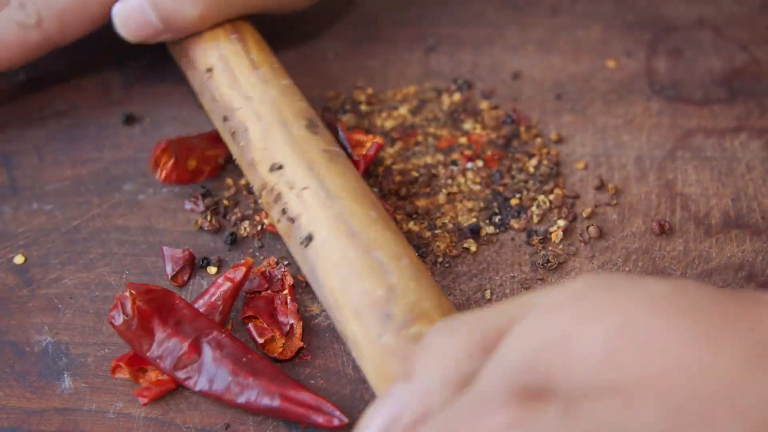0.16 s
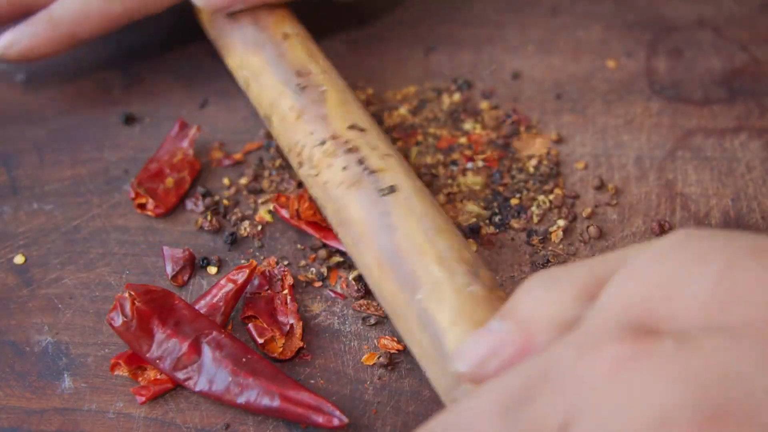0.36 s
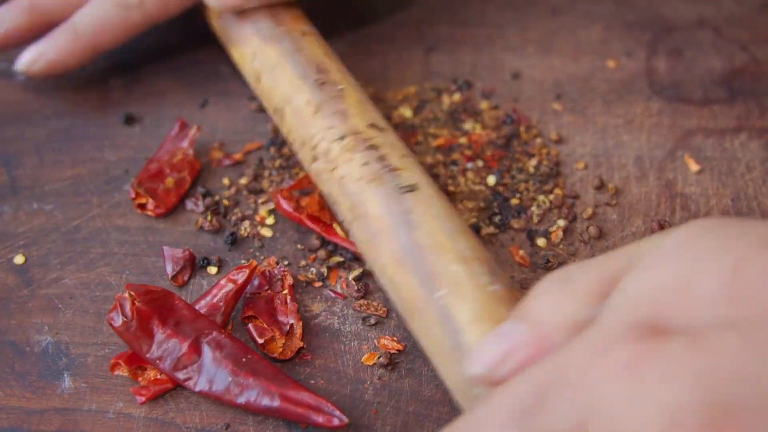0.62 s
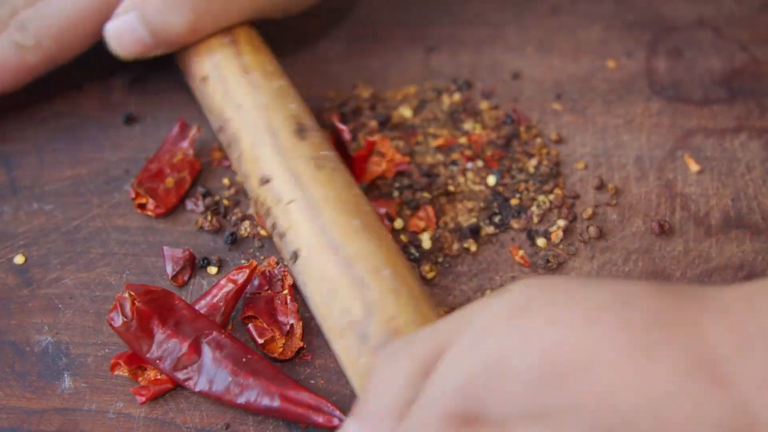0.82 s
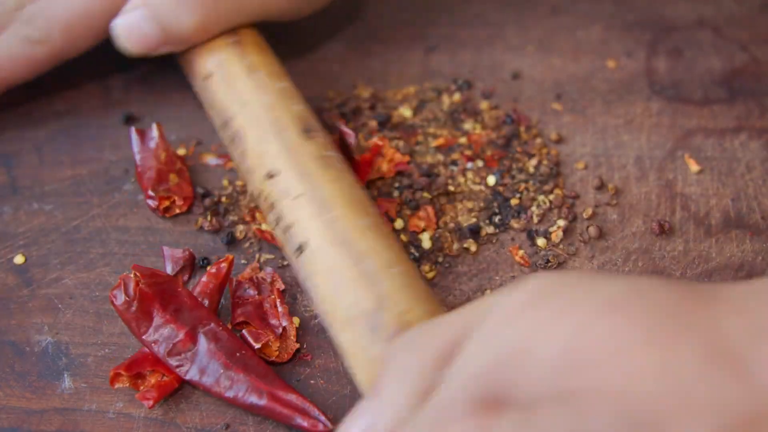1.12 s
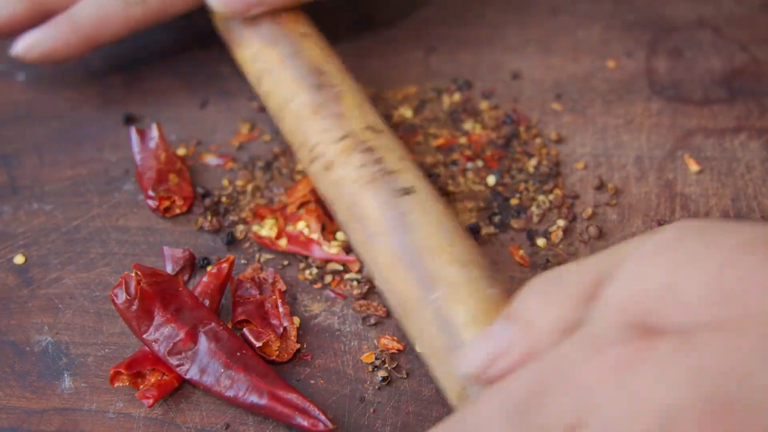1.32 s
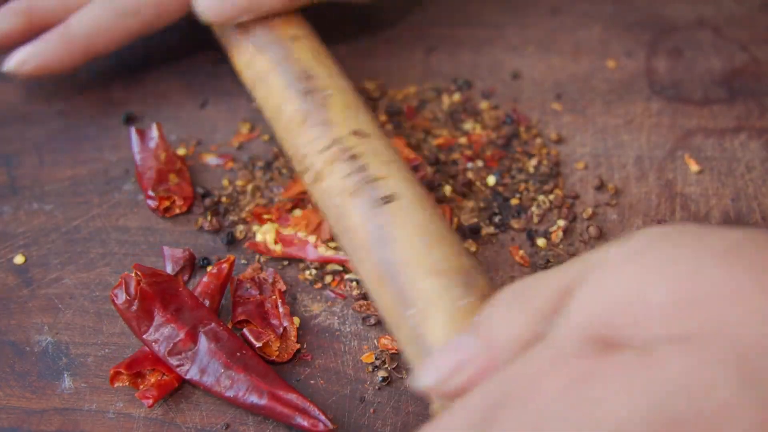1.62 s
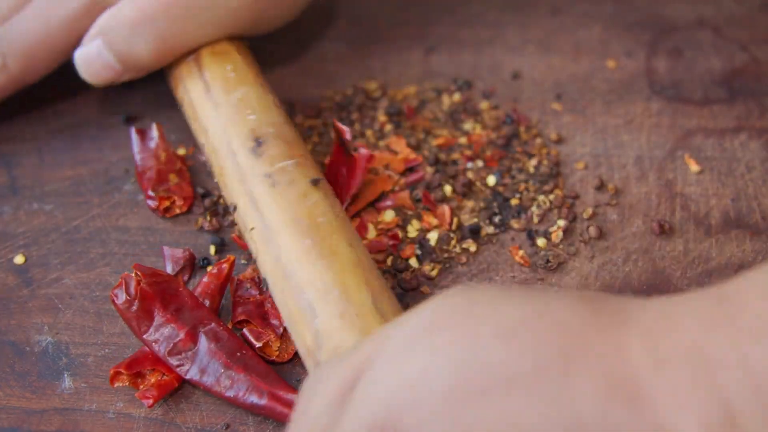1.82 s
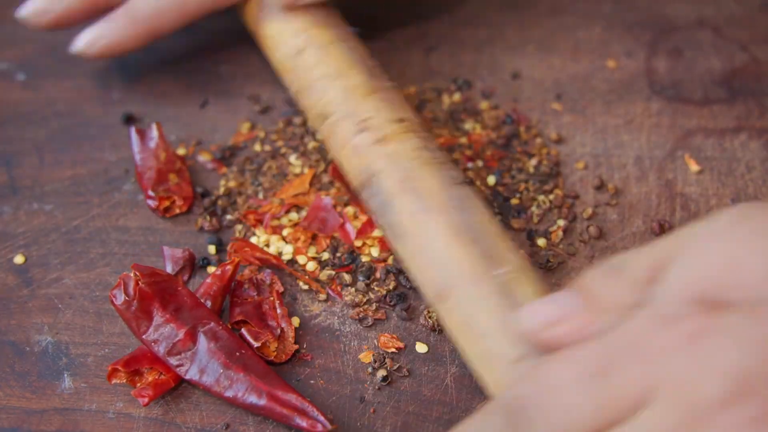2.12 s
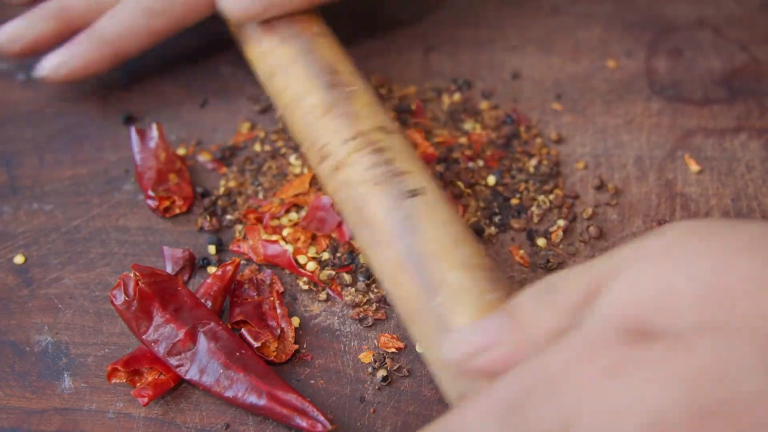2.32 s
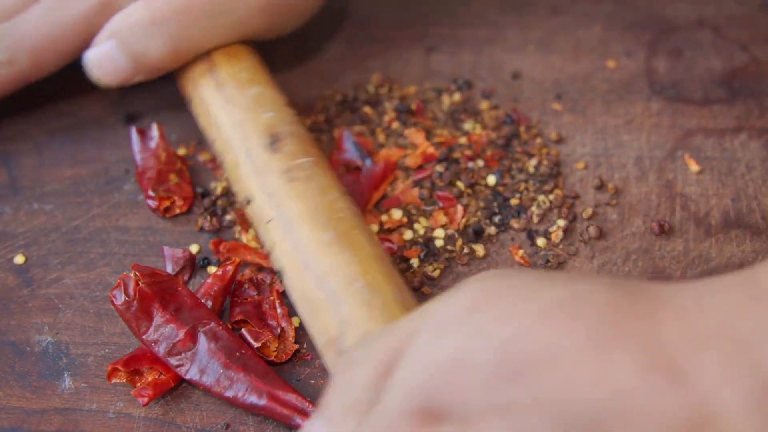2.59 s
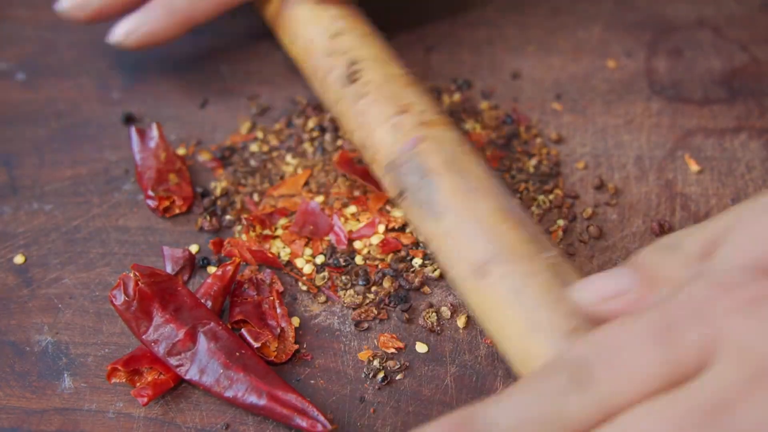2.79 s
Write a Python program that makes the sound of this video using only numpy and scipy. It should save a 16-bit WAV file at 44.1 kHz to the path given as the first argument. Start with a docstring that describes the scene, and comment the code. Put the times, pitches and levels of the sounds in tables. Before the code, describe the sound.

Close crunching and crackling of dried spices fills a small room as a wooden pin rolls back and forth over chilies and peppercorns. After a soft opening hiss, husks snap repeatedly while the pin bumps and knocks against the board.

```python
"""Rolling pin over dried chilies

Close on one microphone in a small room, a wooden pin rolls over chilies and peppercorns on a board.
Crumbs crunch, dry skins rustle and the table thuds under the bumpy roll; one whole pod hisses flat.
Husks burst in sharp cracks that ring pin and board, and the pin knocks as it drops off a grain.
A fast limiter behind the microphone flattens the loudest cracks."""
import sys
import numpy as np
from scipy import signal
from scipy.fft import rfft, irfft
from scipy.io import wavfile
from scipy.ndimage import uniform_filter1d, minimum_filter1d

SR = 44100
rng = np.random.default_rng(int(sys.argv[2]) if len(sys.argv) > 2 else 0)


def digitize_waveform(pressure):
    """Quantize a signal to 16-bit integers and store it at the path in sys.argv[1].

    Rows of a 2-D input are taken as channels; values are limited to [-1, 1].
    """
    field = np.atleast_2d(pressure).T
    bounded = np.clip(field, -1, 1)
    quanta = np.round(bounded * 32767).astype(np.int16)
    wavfile.write(sys.argv[1], SR, quanta)


N = 130095

# Table levels are relative; each source adds its own gain.
# crunch under the pin, a curve: time_s, wood_db, crackle_db, rustle_db
CRUNCH_LEVELS = [(0.02, -51.5, -54, -55), (0.1, -41.5, -45, -42), (0.16, -47.5, -58, -52.5),
                 (0.27, -43, -54, -40), (0.41, -40, -48, -44.5), (0.47, -44, -48.5, -49.5),
                 (0.56, -39.5, -47, -50.5), (0.655, -46.5, -51, -49), (0.72, -36.5, -44.5, -45.5),
                 (0.83, -45, -49.5, -53.5), (0.92, -39, -46.5, -49.3), (1.0, -39, -41, -45),
                 (1.075, -52, -59, -63), (1.11, -48.5, -52.5, -62), (1.15, -36.5, -45.5, -45.5),
                 (1.23, -34.5, -43, -46), (1.36, -46, -51.5, -57), (1.435, -35.5, -44.5, -48),
                 (1.505, -52.5, -62.5, -67), (1.58, -39, -45, -50), (1.68, -38.5, -41, -49),
                 (1.76, -36, -42, -45), (1.84, -48, -50, -56), (1.89, -45.5, -52.5, -58),
                 (1.96, -64.4, -67, -85), (2.005, -36.5, -42, -47), (2.08, -44, -50.5, -56),
                 (2.17, -36.1, -47.5, -51), (2.25, -48.5, -56.7, -64), (2.29, -39.5, -44, -52),
                 (2.41, -38, -43, -48.5), (2.5, -39, -43.9, -50.5), (2.56, -64, -61.5, -68),
                 (2.61, -59, -66, -83), (2.7, -42, -45, -52.5), (2.74, -47.5, -53, -62),
                 (2.825, -32, -40, -45.5), (2.89, -51, -53.5, -57), (2.94, -38, -45.5, -52)]
# table shaken by the rolling, a curve: time_s, level_db
THUD_LEVELS = [(0.05, -64), (0.25, -57), (0.49, -60), (0.555, -37.5), (0.63, -64), (0.7, -44), (0.83, -66),
               (0.97, -44.5), (1.08, -69), (1.15, -48), (1.36, -53), (1.43, -48.5), (1.5, -56), (1.55, -48),
               (1.7, -50), (1.93, -73), (2.0, -52), (2.16, -50.5), (2.24, -66), (2.3, -47), (2.6, -69.5),
               (2.83, -47), (2.92, -57)]
# husks bursting: start_s, snap_db, treble_db, wood_db
HUSK_BURSTS = [(0.2057, -45, -33.5, -39), (0.2879, -41, -32, -36), (0.3294, -42.5, -44, -41.5),
               (0.3744, -41.2, -38.5, -34), (0.4405, -43, -57, -31.5), (0.5477, -30, -39.5, -25.5),
               (0.5831, -31.5, -45.5, -27.8), (0.6765, -28.5, -42, -27), (0.7435, -40, -57, -36),
               (0.7576, -36, -45, -33.5), (0.9064, -29, -40, -26.5), (0.9264, -36, -54, -41),
               (0.955, -24.5, -29.5, -32.5), (0.979, -31.5, -39, -27.5), (1.0092, -40, -56, -34),
               (1.0982, -38.5, -52, -59), (1.1249, -28.0, -34, -27.5), (1.1639, -30, -43, -28.5),
               (1.1861, -31.5, -47, -32), (1.2027, -33, -41, -27.5), (1.218, -33.5, -62, -37),
               (1.2333, -38, -59, -29), (1.259, -35.5, -45, -34), (1.2767, -30, -44, -27),
               (1.4007, -34.5, -50, -28), (1.5552, -28, -40, -26.5), (1.5695, -28, -42, -36),
               (1.6248, -28.5, -38, -30), (1.6515, -27, -40, -31), (1.6618, -29, -31.6, -28),
               (1.7389, -32, -52, -37.5), (1.7446, -34, -36, -33.5), (1.9887, -28.5, -41, -27.5),
               (2.1132, -27, -37, -29), (2.1514, -34, -48, -31.5), (2.1819, -33.5, -45, -28),
               (2.2693, -30.5, -42.5, -26), (2.3033, -31, -39, -34), (2.321, -38, -49, -31.5),
               (2.3483, -28.5, -43, -33.5), (2.3892, -32, -46.5, -28.5), (2.5162, -34.8, -47, -34.5),
               (2.6179, -41, -54.5, -40.5), (2.67, -36.5, -50, -31.5), (2.7926, -39.5, -64, -40),
               (2.8133, -29.5, -40.5, -33), (2.9082, -39.5, -63, -38.5), (2.9382, -39.5, -61, -35)]
# the pin dropping onto the board: start_s, level_db, clack_db
PIN_DROPS = [(0.5044, -39, -37), (0.5227, -29.5, -46), (1.411, -39, -57), (1.4235, -29, -61),
             (1.5264, -26.5, -28), (2.162, -27, -24.5), (2.2909, -30.5, -29.5), (2.8025, -30.5, -42.8)]
# ringing modes of board, pin and table: pitch_hz, level_db, t60_s
BOARD_MODES = [(843.7, 0, 0.028), (980, 2, 0.0093), (1205, -2.5, 0.016), (1267, -3.5, 0.014),
               (1250, -10.5, 0.021), (2060, -8, 0.023), (2626, -16, 0.016)]
PIN_MODES = [(2060, -11.5, 0.021), (3206, 4, 0.019), (4575, -1, 0.011), (6236, -3.5, 0.012)]
TABLE_MODES = [(93, 1, 0.17), (174, -7, 0.14), (309, -12.5, 0.25), (420.7, -8, 0.12)]
# spectra: frequency_hz, level_db
RUMBLE_SPECTRUM = [(22, -18.5), (33, -7.5), (41, -18.5), (60, -28), (150, -46), (600, -61)]  # the room's low air
GRIND_SPECTRUM = [(60, -20), (220, 1.5), (580, -14.5), (720, -0.5), (900, 9.5), (1250, 12), (1600, -3),
                  (4000, -23.5)]  # dull body of the wood
CRACKLE_SPECTRUM = [(300, -9.5), (1000, -11), (1800, 0.5), (2600, 5.5), (3300, 3), (4700, 7), (6500, 1),
                    (9000, -15), (14500, -17.5)]  # crumbs breaking
RUSTLE_SPECTRUM = [(1000, -69), (3000, -22.5), (5000, -10), (7000, 4), (8700, 5.5), (10500, -4),
                   (12500, -0.5), (14500, -5)]  # dry skins
POD_SPECTRUM = [(2200, -13), (4500, 7), (8500, -1), (10500, -2.5), (14500, -0.5)]  # a whole pod sliding under the pin
SNAP_SPECTRUM = [(300, -24), (900, -14.5), (1900, 7.5), (2600, 12.5), (3300, 5), (4600, 9), (6300, -7.5),
                 (8500, -9), (14500, -33.5)]  # a husk tearing
CLACK_SPECTRUM = [(700, -8.5), (1600, 5), (3300, -0.5), (5000, -59)]  # hard edge of a knock

CONTACT_HZ = 1084  # the board's pitch under a blow


def amp(db):
    """Decibels to gain."""
    return 10 ** (np.asarray(db) / 20)


def blow(x, duration_s=0.005):
    """Scales a short sound to the energy of rms 1 held for duration_s."""
    return x * np.sqrt(duration_s * SR / (np.sum(x ** 2) + 1e-20))


def level(curve, column=1):
    """One dB column of a curve as gain per sample."""
    rows = np.array(curve)
    return amp(np.interp(np.arange(N) / SR, rows[:, 0], rows[:, column]))


def add(mix, start_s, sound):
    """Mixes a sound in at start_s."""
    part = mix[max(round(start_s * SR), 0):][:len(sound)]
    part += sound[:len(part)]


def through(x, response):
    """Convolves, keeping the length."""
    return signal.fftconvolve(x, response)[:len(x)]


def colour(spectrum, size=4096):
    """Minimum-phase impulse response with the given spectrum."""
    hz, db = np.transpose(spectrum)
    bins_hz = np.fft.rfftfreq(size, 1 / SR)
    gain = amp(np.interp(np.log(bins_hz + 1), np.log(hz), db))
    cepstrum = irfft(np.log(gain))
    cepstrum[1:size // 2] *= 2
    cepstrum[size // 2 + 1:] = 0
    return irfft(np.exp(rfft(cepstrum)))


def ringing(modes, size=6000):
    """Impulse response of dying modes of alternating sign."""
    t = np.arange(size) / SR
    return sum((-1) ** k * amp(db) * np.exp(-np.log(1000) * t / t60_s) * np.sin(2 * np.pi * hz * t)
               for k, (hz, db, t60_s) in enumerate(modes))


def steady(x, size=1000):
    """Holds the running level at 1, leaving single grains standing out."""
    power = uniform_filter1d(uniform_filter1d(x ** 2, size), size)
    return x / np.sqrt(abs(power) + 1e-12)


def room_tone():
    """The room at the microphone: deep rumble and faint hiss."""
    rumble = through(rng.standard_normal(N), colour(RUMBLE_SPECTRUM, size=32768))
    hiss = rng.standard_normal(N)
    return amp(-49.5) * steady(rumble, size=5000) + amp(-92) * hiss


def fractures(per_s=2600, spread_db=5.5):
    """Tiny random fractures, many faint and a few strong."""
    strengths = amp(spread_db * np.minimum(rng.exponential(1, N), 3.28))
    return strengths * rng.choice([-1, 1], N) * (rng.random(N) < per_s / SR)


def crumb_crunch():
    """Crumbs break under the pin: they crackle, and ring pin, board and table; dry skins rustle."""
    clicks = fractures()
    decay = np.exp(-np.arange(64) / SR / 0.00059)  # each click sets off a puff of noise
    tearing = np.sqrt(abs(through(clicks ** 2, decay))) * rng.standard_normal(N)
    board = amp(-3) * steady(through(clicks, ringing(BOARD_MODES)))
    grind = amp(-2) * steady(through(clicks, colour(GRIND_SPECTRUM)))
    table = amp(-24.5) * steady(through(clicks, ringing(TABLE_MODES[2:])))
    crackle = amp(-1.5) * steady(through(tearing, colour(CRACKLE_SPECTRUM)))
    pin = amp(-2.5) * steady(through(clicks, ringing(PIN_MODES)))
    rustle = amp(0.5) * steady(through(tearing, colour(RUSTLE_SPECTRUM)))
    return ((board + grind + table) * level(CRUNCH_LEVELS, column=1)
            + (crackle + pin) * level(CRUNCH_LEVELS, column=2)
            + rustle * level(CRUNCH_LEVELS, column=3))


def table_thuds():
    """The bumpy roll shakes the low modes of the table under the board."""
    shaking = through(fractures(), ringing(TABLE_MODES))
    return amp(3) * level(THUD_LEVELS) * steady(shaking, size=2000)


def pod_hiss(peak_s=0.26, width_s=0.13):
    """A leathery pod hisses smoothly as the first stroke flattens it, swelling and fading."""
    swell = np.exp(-abs(np.arange(N) / SR - peak_s) / width_s)
    hiss = steady(through(rng.standard_normal(N), colour(POD_SPECTRUM)))
    return amp(-41) * swell * hiss


def board_contact(pitch_hz, swell_s, size=3000):
    """The first few heavily damped swings of the board under a blow."""
    t = np.arange(size) / SR
    return blow(t * np.exp(-t / swell_s) * np.sin(2 * np.pi * pitch_hz * t))


def husk_cracks(tear_s=0.001, crumble_s=0.0048, push_s=0.0011, board_delay_s=0.0008, size=3000):
    """A husk tears in a millisecond, crumbles briefly, and jolts pin and board."""
    out, t = np.zeros(N), np.arange(size) / SR
    snap, treble, grind = colour(SNAP_SPECTRUM), colour(RUSTLE_SPECTRUM), colour(GRIND_SPECTRUM)
    pin, board = ringing(PIN_MODES), ringing(BOARD_MODES)
    for start_s, snap_db, treble_db, wood_db in HUSK_BURSTS:
        tear, crumbs, jolt = rng.standard_normal((3, size))
        burst = blow(np.sign(tear) * np.exp(-(t / tear_s) ** 2))
        burst += amp(-6) * blow(crumbs ** 3 * np.exp(-t / crumble_s))
        crack = blow(through(burst, snap)) + amp(4.5) * blow(through(burst, pin))
        add(out, start_s, amp(snap_db + 0.5) * blow(crack))
        add(out, start_s, amp(treble_db + 5.5) * blow(through(burst, treble)))
        push = jolt * np.exp(-t / push_s)
        ring = amp(-1.5) * blow(through(push, board)) + amp(-6) * blow(through(push, grind))
        contact = board_contact(CONTACT_HZ * np.exp(0.11 * jolt[0]), push_s)  # pitch varies by husk
        add(out, start_s + board_delay_s, amp(wood_db + 0.5) * blow(contact + ring))
    return out


def pin_knocks(impact_s=0.00063, chatter_s=0.0061, size=3000):
    """The pin drops onto the board: a dull wood-on-wood blow with a hard edge and a short chatter."""
    out, t = np.zeros(N), np.arange(size) / SR
    board, grind, edge = ringing(BOARD_MODES), colour(GRIND_SPECTRUM), colour(CLACK_SPECTRUM)
    for start_s, level_db, clack_db in PIN_DROPS:
        chatter = rng.standard_normal(size) * np.exp(-t / chatter_s)
        ring = blow(through(chatter, board)) + blow(through(chatter, grind))
        knock = board_contact(CONTACT_HZ, impact_s) + amp(-5) * ring
        clack = through(chatter * np.exp(-t / impact_s), edge)
        add(out, start_s, amp(level_db + 4) * blow(knock))
        add(out, start_s, amp(clack_db - 0.5) * blow(clack))
    return out


def room_reflections(x, t60_s=0.17, delay_s=0.004, size=12000):
    """The small room's walls answer briefly, faint this close to the board."""
    t = np.arange(size) / SR
    echoes = rng.standard_normal(size) * (rng.random(size) < 0.1) * (t > delay_s)
    tail = echoes * np.exp(-np.log(1000) * t / t60_s)
    return amp(-12) * through(x, tail / np.linalg.norm(tail))


def scene():
    """At the microphone, in mono: the board up close, the room behind it."""
    close = husk_cracks() + pin_knocks() + crumb_crunch() + pod_hiss() + table_thuds()
    return (close + room_reflections(close) + room_tone())[None]


def record(dry, limit_db=-16.5, release_s=0.0013, cutoff_hz=14500):
    """After the microphone: a fast peak limiter, then a low-pass."""
    release = np.arange(N) / SR / release_s
    overshoot = np.log(np.maximum(abs(dry[0]) / amp(limit_db), 1))
    reduction = np.maximum.accumulate(overshoot + release) - release
    gain = uniform_filter1d(minimum_filter1d(np.exp(-reduction), size=15), size=15)
    low_pass = signal.firwin(401, cutoff_hz, window=("kaiser", 8), fs=SR)
    return signal.oaconvolve(dry * gain, low_pass[None], "same")


dry = scene()
out = record(dry)
digitize_waveform(out)
```